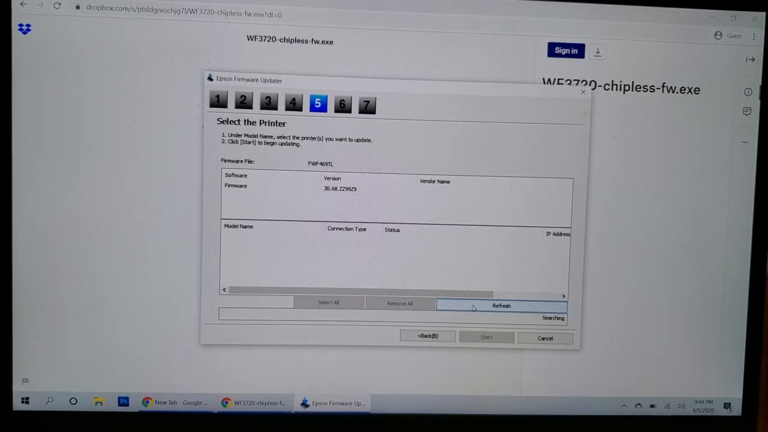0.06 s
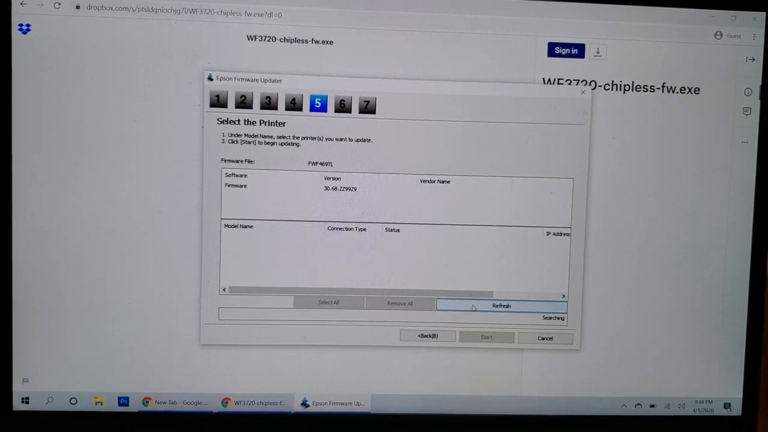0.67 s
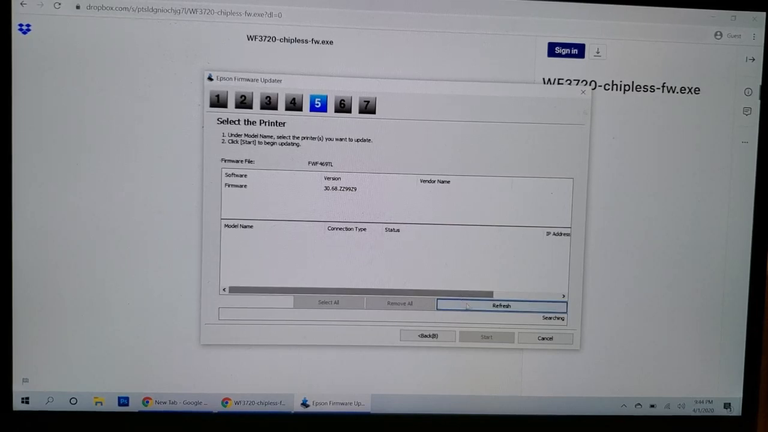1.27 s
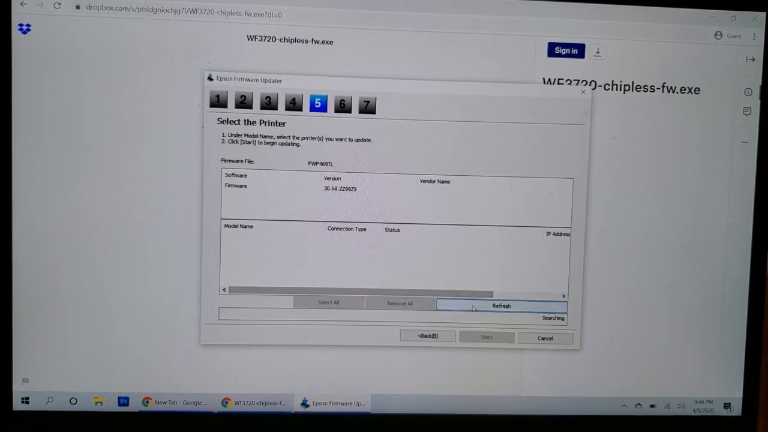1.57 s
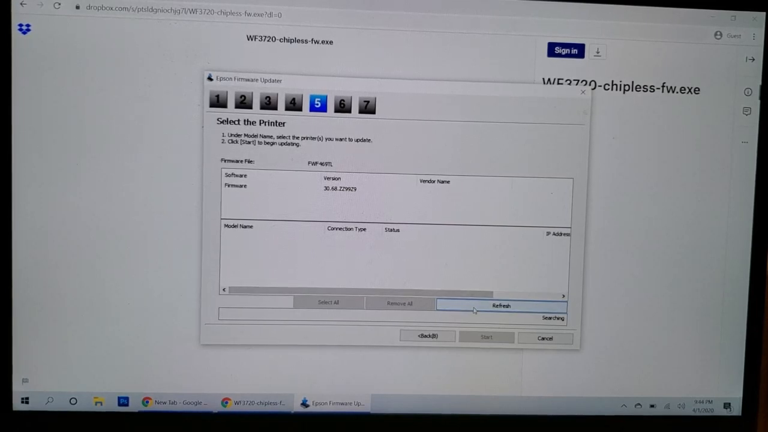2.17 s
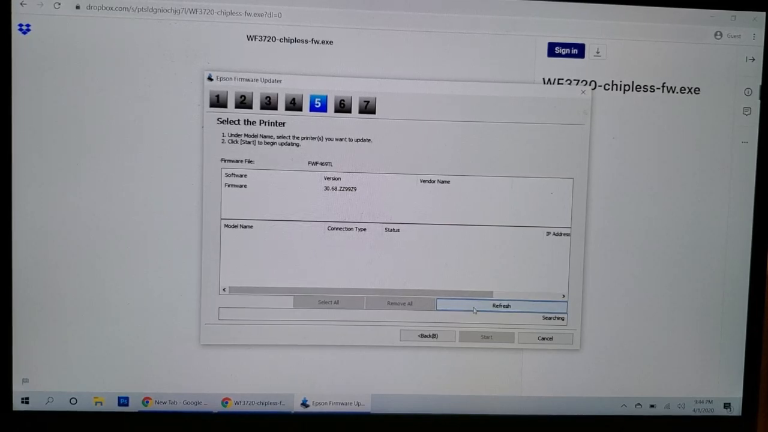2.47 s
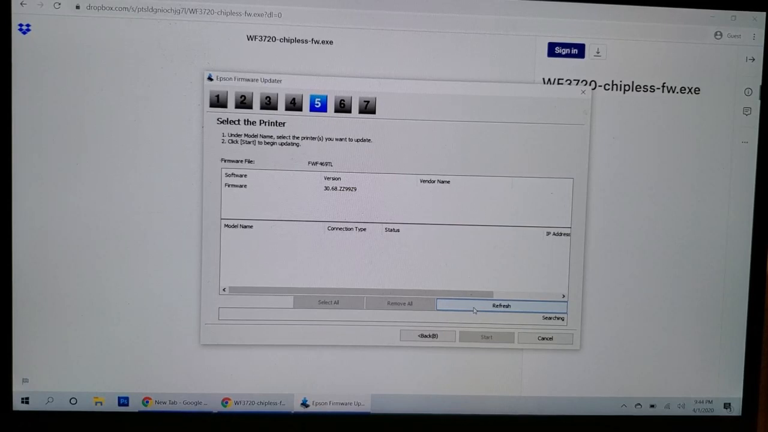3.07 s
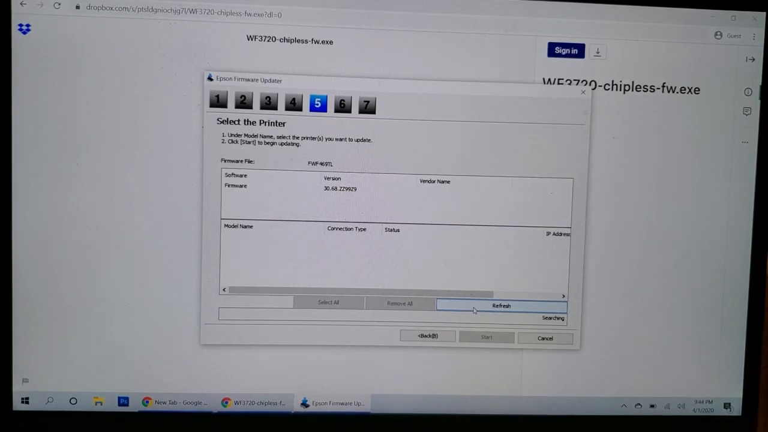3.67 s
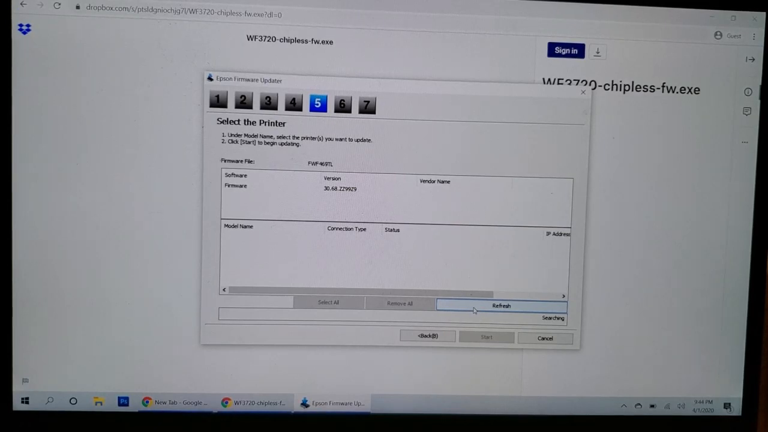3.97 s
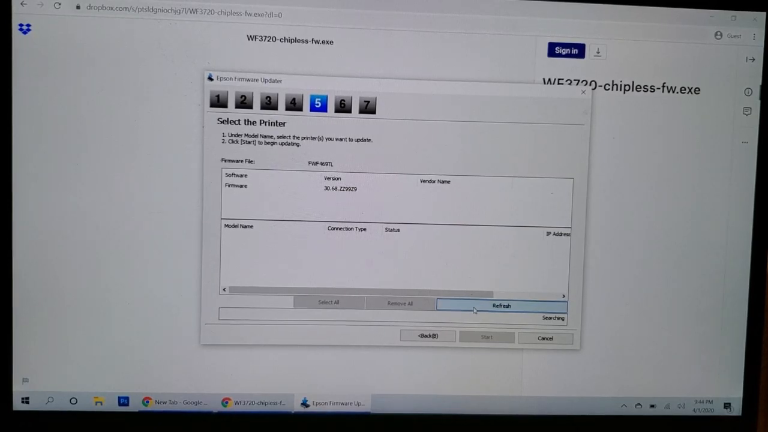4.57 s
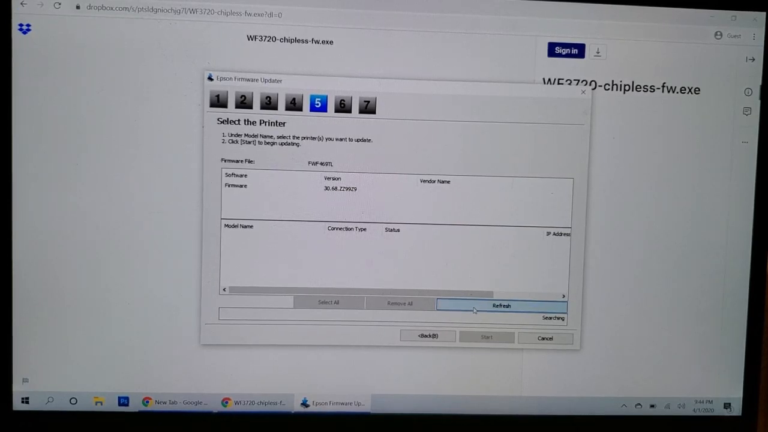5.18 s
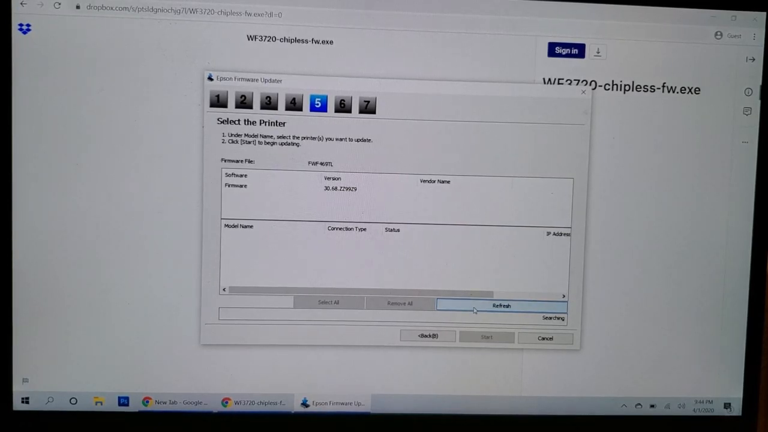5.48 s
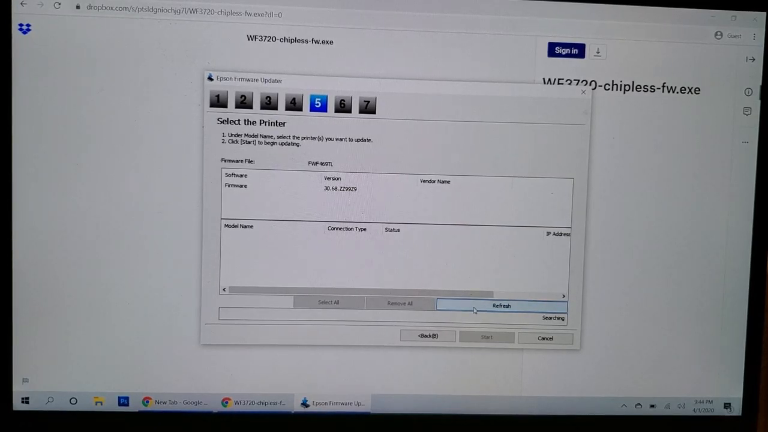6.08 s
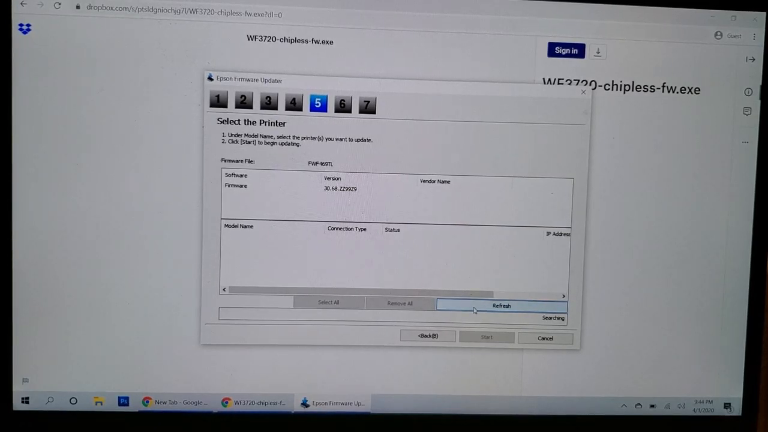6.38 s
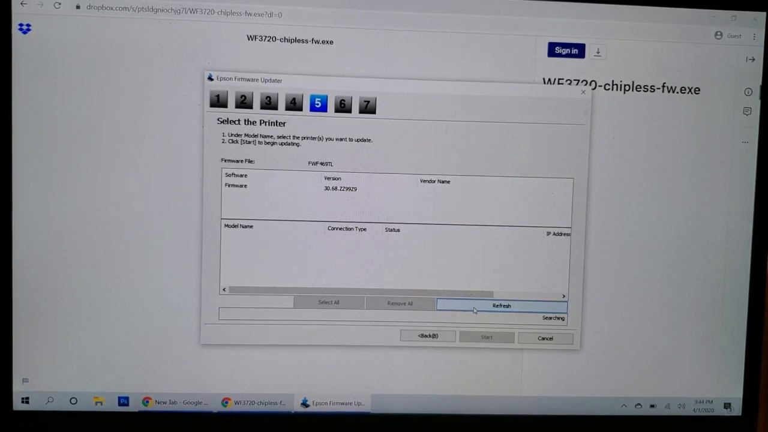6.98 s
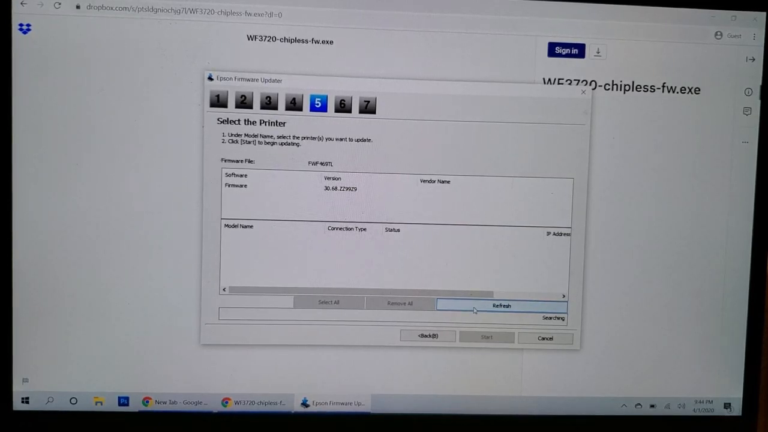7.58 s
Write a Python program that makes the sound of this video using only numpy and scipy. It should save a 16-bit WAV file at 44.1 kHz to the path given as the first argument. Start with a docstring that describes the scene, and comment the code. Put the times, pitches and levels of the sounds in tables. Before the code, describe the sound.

An inkjet printer starts up, its gears rattling and carriage whining twice amid plastic clicks and clunks, over a low hum.

```python
"""Inkjet printer starting up

In a small room, gears rattle, rollers rub and the print carriage makes two whining runs.
Latches and end stops knock the plastic casing, loudest as the carriage parks, and the frame rocks.
The motor drivers whistle faintly; a low hum and a soft fan go on underneath."""
import sys
import numpy as np
from scipy import signal
from scipy.fft import rfft, irfft, next_fast_len
from scipy.io import wavfile
from scipy.ndimage import uniform_filter1d

SR = 44100
rng = np.random.default_rng(int(sys.argv[2]) if len(sys.argv) > 2 else 0)


def transcribe(signal):
    """Save signal, clipped to [-1, 1], as a 16-bit WAV file at the path in sys.argv[1]."""
    frames = np.atleast_2d(signal).T
    limited = np.clip(frames, -1, 1)
    pcm = np.round(limited * 32767).astype(np.int16)
    wavfile.write(sys.argv[1], SR, pcm)


N = 346185
TIME = np.arange(N) / SR


def amp(db):
    """Decibels to gain."""
    return 10 ** (np.asarray(db) / 20)


def unit(x):
    """Scales to rms 1."""
    return x / np.sqrt(np.mean(x ** 2) + 1e-30)


def noise(samples=N):
    """Stereo white noise."""
    return rng.standard_normal((2, samples))


def curve_at(points, hz):
    """Reads a curve on a log-frequency axis."""
    freqs, values = np.transpose(points)
    return np.interp(np.log(hz + 1), np.log(freqs), values)


def add(mix, start_s, sound):
    """Mixes a sound in at its start time."""
    part = mix[:, max(round(start_s * SR), 0):][:, :sound.shape[-1]]
    part += sound[..., :part.shape[-1]]


def shaped(x, gain):
    """Filters by a gain that is a function of frequency."""
    size = next_fast_len(x.shape[-1])
    return irfft(rfft(x, size) * gain(np.fft.rfftfreq(size, 1 / SR)), size)[..., :x.shape[-1]]


def coloured(x, eq):
    """Applies an EQ curve and scales to rms 1."""
    return unit(shaped(x, lambda hz: amp(curve_at(eq, hz))))


def drift(rate_hz):
    """A random wander of rms 1."""
    knots = np.arange(0, N / SR + 1, 1 / (2 * rate_hz))
    return unit(np.interp(TIME, knots, rng.standard_normal(len(knots))))


def switched(rows):
    """On-off envelope with softened edges."""
    gates = sum(amp(db) * ((TIME >= start) & (TIME < end)) for start, end, db in rows)
    return uniform_filter1d(gates, size=600)


def stroke(start, length, rise_s, fade_db_per_s, surge_db=0, settle_s=0.055):
    """Envelope of one movement: rise, an optional surge that settles, hold, release."""
    out, t = np.zeros((1, N)), np.arange(SR) / SR
    db = surge_db * np.exp(-t / settle_s) - fade_db_per_s * np.maximum(t - length, 0)
    add(out, start, np.minimum(t / rise_s, 1) * amp(db))
    return out[0]


def rubs(rows):
    """Envelope of rubbing strokes that swell and die away."""
    return np.max([amp(db) * stroke(start, length, rise_s=0.035, fade_db_per_s=193.5)
                   for start, length, db in rows], axis=0)


def tones(rows, waver_rad):
    """Steady sines whose phase wanders a little."""
    return sum(np.sqrt(2) * amp(db)
               * np.sin(2 * np.pi * (hz * TIME + rng.random()) + waver_rad * drift(2.5))
               for hz, db in rows)


def whine(times, hz, db, harmonics, jitter, flutter_db, overtone_db=3):
    """An unsteady tone along pitch and level curves; each overtone swells and fades by itself."""
    out, t = np.zeros((2, N)), np.arange(times[0], times[-1], 1 / SR)
    wobble, flutter = (unit(uniform_filter1d(row, 300)) for row in noise(len(t)))
    cycles = np.cumsum(np.interp(t, times, hz) * (1 + jitter * wobble)) / SR
    stereo_offset = np.array([[0], [1 / 6]])
    tone = 0
    for multiple, harmonic_db in harmonics:
        swell = unit(uniform_filter1d(rng.standard_normal(len(t)), size=2000, mode="wrap"))
        gain = amp(harmonic_db + (multiple > 1) * overtone_db * swell)
        tone = tone + gain * np.cos(2 * np.pi * (multiple * cycles + stereo_offset))
    envelope = amp(np.interp(t, times, db) + flutter_db * flutter) * signal.windows.tukey(len(t), 0.1)
    add(out, times[0], unit(tone) * envelope)
    return out


# Room tone: freq_hz, gain_db
AIR_EQ = [(25, -20.5), (50, 2), (90, -3), (150, -14.5), (240, -12.5), (370, -23.5), (480, -32.5),
          (900, -39.5), (1600, -41), (3700, -42), (8000, -53.5), (11000, -46.5), (13000, -40.5),
          (15800, -38)]
# The fan's soft whoosh: freq_hz, gain_db
FAN_EQ = [(76, -36), (130, -5), (156, -6.5), (238, -0.5), (273, -15), (341, 1.5), (401, -11.5), (470, -4),
          (747, -5.5), (1010, -15.5), (1390, -14), (2040, -33.5), (4940, -29.5), (9770, -42),
          (15800, -34.5)]
# The fan's fade-up: time_s, level_db
FAN_FADE = [(0, -86), (1, -79.5), (3.55, -73), (4.2, -66.5), (5.7, -66.5), (6.05, -61), (7.85, -65)]


def background(air_db=-59.5, rumble_db=-50.5, rumble_hz=75, left_db=1.5):
    """Room air, a fan that slowly comes up, and one dull rumble near the end."""
    air = amp(air_db) * coloured(noise(), AIR_EQ)
    fan_db = np.interp(TIME, *np.transpose(FAN_FADE)) + 2.05 * drift(10)
    fan = amp(fan_db) * coloured(noise(), FAN_EQ)
    swell = amp(rumble_db) * stroke(start=6.62, length=0.23, rise_s=0.073, fade_db_per_s=100)
    rumble = swell * unit(shaped(noise(), lambda hz: hz / (1 + (hz / rumble_hz) ** 2) ** 1.5))
    return (air + fan + rumble) * amp([[left_db], [-left_db]])


# Low hum: pitch_hz, level_db
HUM_TONES = [(53.8, -63), (80.7, -69.5), (107.6, -62), (150.7, -70.5)]
# Thin whistle of the power supply coils: pitch_hz, level_db
COIL_TONES = [(12602, -91.5), (12629, -93.5), (13583, -90)]
# The main driver holds its motor still: start_s, end_s, level_db
MAIN_DRIVER_HOLDS = [(0, 1.087, -89), (1.095, 1.546, -70.5), (2.143, 2.587, -73.5), (3.64, 4.07, -76.5)]
# A second driver, higher and fainter: start_s, end_s, level_db
FEED_DRIVER_HOLDS = [(0, 0.45, -79), (1.55, 1.8, -77), (3.3, 3.63, -99), (4.07, 4.62, -84)]
# The main driver's hiss: freq_hz, gain_db
SIZZLE_EQ = [(3000, -10), (5500, -2.5), (7300, -14), (9400, 0), (11000, -21), (13500, 1), (15000, -27)]


def electronics(left_db=3, sizzle_db=-2):
    """Hum and coil tones run throughout; the drivers whistle and sizzle while they hold."""
    holding = switched(MAIN_DRIVER_HOLDS)
    whistle = holding * tones([(13585, 0)], waver_rad=0.7)
    whistle += switched(FEED_DRIVER_HOLDS) * tones([(14513, 0)], waver_rad=0.7)
    sizzle = holding * amp(sizzle_db + 2 * drift(25)) * coloured(noise(), SIZZLE_EQ)
    hum = tones(HUM_TONES, waver_rad=0.15)
    coils = tones(COIL_TONES, waver_rad=0.5)
    return hum + (whistle + coils) * amp([[left_db], [-left_db]]) + sizzle


# Soft squeaks of shafts and rollers: start_s, end_s, pitch_hz, peak_db
SHAFT_SQUEAKS = [(0.467, 0.64, 4750, -66), (2.6, 2.788, 2410, -68), (2.79, 2.988, 5650, -76),
                 (2.831, 2.964, 8550, -78), (2.941, 3.045, 2100, -76), (4.2, 4.306, 4620, -54),
                 (5.398, 5.68, 3900, -75.5), (5.492, 5.703, 2600, -74)]


def squeaks(fade_db=12, relative_width=0.018):
    """Friction excites one narrow resonance, which swells and fades."""
    out = np.zeros((2, N))
    for start, end, hz, db in SHAFT_SQUEAKS:
        ring = unit(shaped(noise(SR // 2), lambda f: 1 / (1 + ((f / hz - 1) / relative_width) ** 2)))
        ring = ring[:, :round((end - start) * SR)]
        add(out, start, ring * amp(db - fade_db * abs(np.linspace(-1, 1, ring.shape[1]))))
    return out


# Roller strokes: start_s, length_s, level_db
ROLLER_RUBS = [(2.58, 0.051, -67), (4.8, 0.33, -63.5), (5.3, 0.25, -76.5)]
# Their reedy ring: freq_hz, gain_db
ROLLER_EQ = [(1500, -13), (2350, -11), (2600, -1), (2900, -14), (3400, -9.5), (3900, -5.5), (4600, -13.5),
             (5200, -14.5), (7000, -24), (16000, -42.5)]


def rollers(flutter_db=2.5):
    """Rubber rollers rub unevenly."""
    return rubs(ROLLER_RUBS) * amp(flutter_db * drift(30)) * coloured(noise(), ROLLER_EQ)


# Harmonics of the feed's drone: multiple, gain_db
FEED_HARMONICS = [(1, 11), (2, -21), (3, -31), (4, -13)]


def paper_feed(start_s=2.58, length_s=0.42, fast_hz=139.2, slow_hz=77.9, slowing_s=0.125, level_db=-54):
    """The paper feed drones lower and lower as it slows."""
    t = np.linspace(0, length_s, 30)
    hz = slow_hz + (fast_hz - slow_hz) * np.exp(-t / slowing_s)
    return whine(start_s + t, hz, np.full_like(t, level_db), FEED_HARMONICS, jitter=0.023, flutter_db=3)


# The carriage crosses its rail: start_s, driven_s, tooth_hz, whine_db, hiss_db
CARRIAGE_RUNS = [(1.785, 0.275, 1161, -50, -60.5), (4.175, 0.25, 1159, -48, -61.5)]
# Harmonics of motor and belt: multiple, gain_db
WHINE_HARMONICS = [(1, 2), (2, -11.5), (3, -13), (4, -21.5)]


def carriage_motor(speed_up_s=0.0603, brake_s=0.056, motor_db=1, belt_db=-7.5):
    """The motor speeds up, cruises and brakes, lower and softer when slow; the belt sings along."""
    out = np.zeros((2, N))
    for start, driven, tooth_hz, whine_db, _ in CARRIAGE_RUNS:
        t = np.linspace(0, driven, 60)
        slowness = 1 - np.minimum(np.minimum(t / speed_up_s, (driven - t) / brake_s), 1)
        db = whine_db - 16.5 * slowness
        motor_hz = tooth_hz * (1 - 0.074 * slowness)
        belt_hz = 1123 + 850 * t  # climbs as the belt's free length shortens
        out += whine(start + t, motor_hz, db + motor_db, WHINE_HARMONICS, jitter=0.014, flutter_db=1.8)
        out += whine(start + t, belt_hz, db + belt_db, WHINE_HARMONICS, jitter=0.06, flutter_db=3)
    return out


# The carriage drags harder late in each run: start_s, length_s, level_db
RAIL_SCRAPES = [(2.03, 0.065, -54.5), (4.282, 0.15, -53.5)]
# Bright sliding hiss: freq_hz, gain_db
RAIL_EQ = [(500, -30), (900, 3), (1400, 13), (1900, 8), (4000, 10), (6000, 6), (9000, 4.5), (12000, 4),
           (16000, 2)]


def rail(gain_db=4, flutter_db=2.16, slide_on_s=0.044):
    """The carriage hisses along its rail, sliding on for a moment after the motor brakes."""
    slides = [(start, driven + slide_on_s, hiss_db) for start, driven, _, _, hiss_db in CARRIAGE_RUNS]
    rubbing = rubs(slides + RAIL_SCRAPES) * amp(flutter_db * drift(46))
    return amp(gain_db) * rubbing * coloured(noise(), RAIL_EQ)


# Resonances of the plastic panels: pitch_hz, width_hz, gain_db
CASING_MODES = [(465, 18.6, -5), (793, 50, -10.5), (1155, 84, -0.5), (1374, 81, -8), (1470, 40, -11),
                (1750, 40, -19), (2330, 77, -15), (2650, 56, -16), (3616, 380, -13.5), (3940, 230, -12.5),
                (5380, 28, -24.5), (5680, 70, -24.5)]


def casing(x, dry_db):
    """Plastic panels ring at their modes on top of the bare excitation."""
    out = amp(dry_db) * x
    for hz, width, db in CASING_MODES:
        out += amp(db) * signal.lfilter(*signal.iirpeak(hz, hz / width, fs=SR), x)
    return out


# Short moves of the gear train: start_s, length_s, load_db, shake_db
GEAR_MOVES = [(0.46, 0.15, -56.5, -63), (0.557, 0.091, -54.5, -57), (0.645, 0.33, -51.5, -53),
              (1.1, 0.56, -63.5, -58), (1.546, 0.25, -55.5, -52), (1.72, 0.51, -62, -57),
              (2.13, 0.61, -61, -55.5), (2.58, 0.31, -63.5, -57.5), (2.83, 0.08, -61, -60),
              (3.073, 0.078, -71.5, -53), (3.227, 0.038, -71, -57), (3.64, 0.031, -48, -50.5),
              (3.72, 0.39, -62, -57.5), (4.097, 0.13, -55.5, -53), (4.249, 0.29, -60, -55.5),
              (4.582, 0.065, -61, -48.5), (4.752, 0.5, -62.5, -68.5), (5.165, 0.45, -64, -70)]
# Hollow gear rattle: freq_hz, gain_db
RATTLE_EQ = [(120, -29.5), (200, -5), (353, 3), (393, -8), (447, -1), (848, -6), (1000, -13.5), (1180, -13),
             (2080, -20.5), (2690, -26.5), (10400, -37.5), (13900, -31.5), (15800, -51)]
# Bite of loaded teeth: freq_hz, gain_db
GRIND_EQ = [(700, -19.5), (1200, 1.5), (1700, 1.5), (2500, -0.5), (3500, -2.5), (4900, -6.5), (6000, -16),
            (9000, -40)]
# Low shudder of the frame: freq_hz, gain_db
SHAKE_EQ = [(30, -45.5), (55, -2.5), (85, 10), (130, 4), (200, 3.5), (300, -3.5), (600, -43.5)]


def gears(teeth_per_s=700, spread_db=1.5, lump_db=0.5, heavy_load_db=-50):
    """Uneven tooth impacts rattle the casing as the frame shakes; under heavy load the teeth grind."""
    teeth = rng.random(N) < teeth_per_s / SR
    impacts = teeth * amp(spread_db * np.minimum(rng.exponential(1, N), 3))
    drive = casing(unit(impacts * noise()) + noise(), dry_db=3.5)  # impacts plus steady rubbing
    load = shaking = 0
    for start, length, load_db, shake_db in GEAR_MOVES:
        move = stroke(start, length, rise_s=0.014, fade_db_per_s=159, surge_db=5.5)
        load = np.maximum(load, amp(load_db) * move)
        shaking = np.maximum(shaking, amp(shake_db) * move)
    rattle = coloured(drive, RATTLE_EQ) * load * amp(lump_db * drift(40))
    grind = coloured(drive, GRIND_EQ) * load * (load / amp(heavy_load_db)) ** 0.66
    shake = coloured(noise(), SHAKE_EQ) * shaking
    return rattle + amp(-7) * grind + amp(-1) * shake


# Tiny latch springs: start_s, pitch_hz, level_db
SPRING_PINGS = [(0.905, 12200, -35.5), (2.444, 14000, -49.5)]


def springs(width_hz=1100, t60_s=0.051):
    """A snapping spring pings in a tight, high band."""
    out, t = np.zeros((2, N)), np.arange(4096) / SR
    for start, hz, db in SPRING_PINGS:
        ring = unit(shaped(noise(len(t)), lambda f: np.exp(-((f - hz) / width_hz) ** 2)))
        add(out, start, amp(db - 60 * t / t60_s) * ring)
    return out


# The frame rocks on the desk: start_s, level_db, pitch_hz
FRAME_THUMPS = [(0.467, -38.5, 179), (0.507, -42, 156), (0.624, -39, 169), (0.763, -39, 67.6),
                (1.56, -39.5, 87), (1.72, -40, 68), (1.759, -44.5, 210), (2.134, -45, 110),
                (2.185, -45.5, 102), (2.832, -38, 79), (2.872, -43.5, 81), (3.064, -37, 74.7),
                (3.123, -49, 96.9), (3.631, -44, 273), (4.095, -43.5, 135), (4.471, -42, 153),
                (4.599, -43.5, 80.5), (4.625, -45.5, 190), (5.134, -44, 242), (5.142, -43.5, 100)]


def thumps(rise_s=0.0051, t60_s=0.082, shudder_gain=0.69):
    """The whole printer rocks for a few cycles on its feet."""
    out, t = np.zeros((2, N)), np.arange(SR // 4) / SR
    swing = (1 - np.exp(-t / rise_s)) * amp(-60 * t / t60_s)
    swing /= swing.max()
    for start, db, hz in FRAME_THUMPS:
        shudder = unit(shaped(noise(len(t)), lambda f: np.exp(-np.log2((f + 1) / hz) ** 2)))
        add(out, start, amp(db) * swing * (np.sin(2 * np.pi * hz * t) + shudder_gain * shudder))
    return out


# Latches and end stops hit the casing: start_s, strength_db, thud_db, hardness_db
LATCH_KNOCKS = [(0.464, -58.5, -45, -7), (0.622, -36, -46, -1.5), (0.714, -40.5, -61, -7),
                (0.903, -51.5, -63, 8), (1.095, -54.5, -45, -6), (1.55, -65, -52, 5.5),
                (1.662, -40.5, -47.5, 2.5), (2.132, -36.5, -39, -2), (2.181, -38, -44, 0.5),
                (2.21, -41.5, -47, 2.5), (2.593, -57.5, -49.5, -5.5), (2.831, -50.5, -51.5, -5),
                (3.062, -44, -43, -5.5), (3.629, -45.5, -41, -2), (3.671, -35.5, -46, -2),
                (4.033, -78, -60, 11), (4.089, -53.5, -49.5, -1), (4.459, -48, -52, -2),
                (4.552, -39, -46, 0.5), (4.586, -45.5, -41, 3.5), (4.762, -56, -68, 3),
                (4.911, -61.5, -64.5, 1), (5.131, -20.5, -28.5, -2.5), (5.559, -56, -62, -20),
                (6.133, -58, -57.5, -16.5)]


def knocks(attack_s=0.00057, chatter_s=0.011, buzz_db=-14, buzz_s=0.015):
    """A burst of chattering contact, then a dying buzz of loose parts; harder knocks are brighter."""
    out, t = np.zeros((2, N)), np.arange(4096) / SR
    chatter = np.exp(-(t / chatter_s) ** 6)
    buzz = amp(buzz_db) * np.exp(-t / buzz_s)
    contact = (1 - np.exp(-t / attack_s)) * (chatter + buzz)
    contact_rms = np.sqrt(np.mean(contact ** 2))
    for start, db, thud_db, hardness in LATCH_KNOCKS:
        blow = knock_blow(contact, tilt_db_per_octave=0.35 * hardness)
        bands = [((220, 650), thud_db - 2),  # thud
                 ((650, 1600), db - 1.5),  # body
                 ((1600, 4900), db - 0.5 + hardness),  # clack
                 ((5800, 17000), db - 12 + 2 * hardness)]  # tick
        for edges_hz, band_db in bands:
            bandpass = signal.butter(3, edges_hz, "band", fs=SR, output="sos")
            band = np.array([unit(channel) for channel in signal.sosfilt(bandpass, blow)])
            add(out, start, amp(band_db) * contact_rms * band)
    return out


# Raw tone of a knock: freq_hz, gain_db
KNOCK_EQ = [(88, -23.5), (150, 2.5), (465, -10), (522, -6), (756, -8), (994, -9.5), (1140, -8),
            (1280, -9.5), (1440, -9.5), (2000, -11), (3740, -13), (5000, -17.5), (8000, -21),
            (14100, -28.5), (15800, -34.5)]


def knock_blow(contact, tilt_db_per_octave):
    """The noisy force of one contact sets the casing ringing."""
    force = shaped(noise(len(contact)),
                   lambda hz: amp(tilt_db_per_octave * np.log2(np.clip(hz, 700, 6000))))
    return casing(contact * coloured(force, KNOCK_EQ), dry_db=-3)


# The small room's decay: freq_hz, t60_s
ROOM_DECAY = [(80, 0.61), (300, 0.3), (1000, 0.38), (4000, 0.34), (14000, 0.41)]
# The walls swallow treble: freq_hz, gain_db
ROOM_EQ = [(100, 2.5), (1200, -2.5), (3500, -4), (8000, -7), (14000, -4)]


def room(x, wet_db, predelay_s=0.008, echoes_per_s=4000):
    """Sparse reflections, different on each side, each band dying at its own speed."""
    size = SR * 6 // 10
    taps = rng.choice([-1., 1.], (2, size)) * (rng.random((2, size)) < echoes_per_s / SR)
    hz, t, spectra = signal.stft(taps, SR, nperseg=256)
    decay = amp(-60 * t / curve_at(ROOM_DECAY, hz)[:, None])
    tail = signal.istft(spectra * decay, SR, nperseg=256)[1]
    tail = np.pad(tail, ((0, 0), (round(predelay_s * SR), 0))) / np.linalg.norm(tail[0])
    tail = shaped(tail, lambda f: amp(curve_at(ROOM_EQ, f)))
    return x + amp(wet_db) * signal.fftconvolve(x, tail, axes=1)[:, :N]


# How alike left and right sound: freq_hz, coherence
STEREO_COHERENCE = [(50, 0.88), (130, 0.92), (300, 0.71), (640, 0.59), (1400, -0.0071), (3000, -0.24),
                    (7000, 0.12), (15000, -0.27)]


def stereo_pair(x):
    """Two close microphones hear nearly the same bass and largely unrelated treble."""
    mid = shaped(x[0] + x[1], lambda hz: np.sqrt(1 + curve_at(STEREO_COHERENCE, hz)) / 2)
    side = shaped(x[0] - x[1], lambda hz: np.sqrt(1 - curve_at(STEREO_COHERENCE, hz)) / 2)
    return np.array([mid + side, mid - side])


# The printer's place in the image: freq_hz, left_minus_right_db
PRINTER_PAN = [(60, -1.5), (150, 4.5), (500, 0.2), (1200, 2.5), (4000, 4), (8000, 1.5), (13000, 5.5)]


def pan_left(x):
    """The printer stands to the left, so most bands are louder on that side."""
    return shaped(x, lambda hz: amp(curve_at(PRINTER_PAN, hz) * np.array([[0.5], [-0.5]])))


def scene():
    """The printer's hits and running gear in their room, over the bed of air, fan and hum."""
    hits = room(knocks(), wet_db=1) + room(springs(), wet_db=-8) + room(thumps(), wet_db=-2.5)
    friction = room(gears() + rail() + rollers(), wet_db=-4.5)
    singing = room(carriage_motor() + paper_feed() + squeaks(), wet_db=-0.5)
    printer = pan_left(stereo_pair(hits + friction + singing))
    return printer + stereo_pair(background()) + electronics()


def record(dry, low_cut_hz=44, high_cut_hz=15900):
    """Steep cuts trim the deepest bass and the very top."""
    cut = signal.sosfilt(signal.butter(6, low_cut_hz, "high", fs=SR, output="sos"), dry)
    lowpass = signal.firwin(511, high_cut_hz, window=("kaiser", 9), fs=SR)
    return signal.oaconvolve(cut, lowpass[None], "same")


dry = scene()
out = record(dry)
transcribe(out)
```